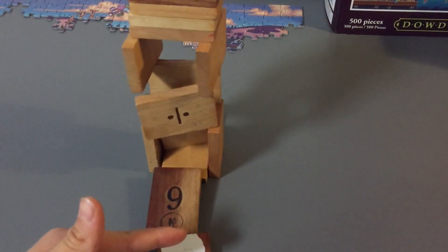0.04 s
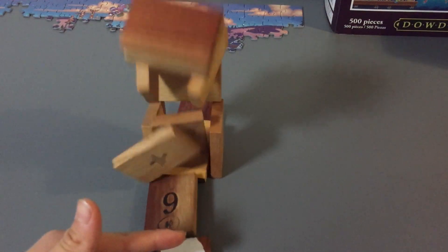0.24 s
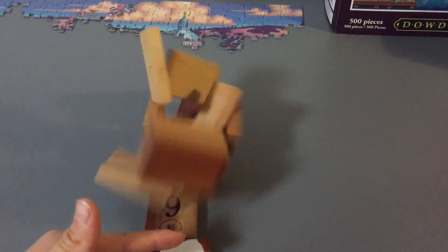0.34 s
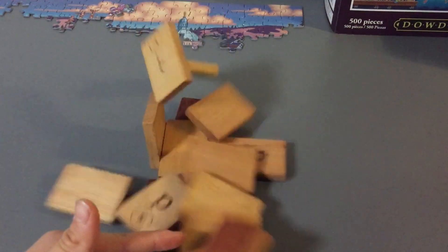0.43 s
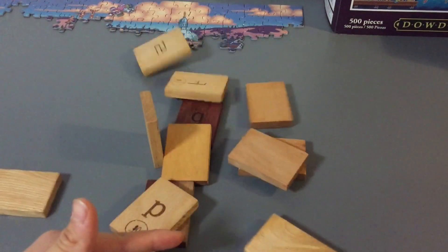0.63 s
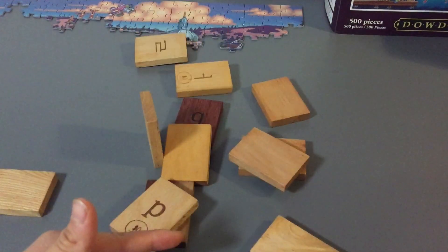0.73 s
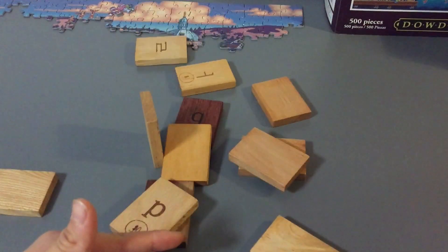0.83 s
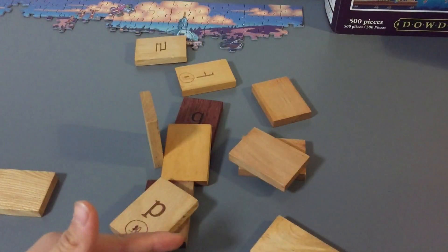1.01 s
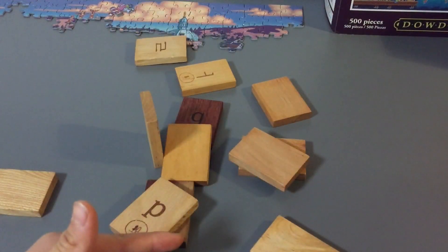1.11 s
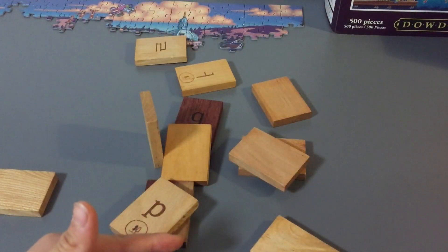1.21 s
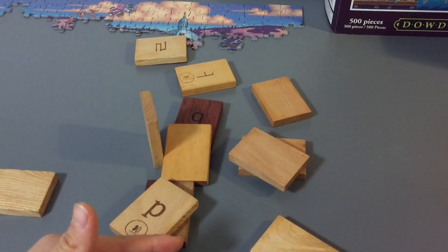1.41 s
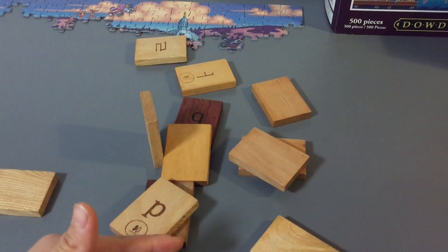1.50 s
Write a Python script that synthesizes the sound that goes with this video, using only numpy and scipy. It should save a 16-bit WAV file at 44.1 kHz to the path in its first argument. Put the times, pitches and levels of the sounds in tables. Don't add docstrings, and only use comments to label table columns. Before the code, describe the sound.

Wooden tiles scrape faintly, then a tower collapses onto a table in a dense, bright clatter lasting over half a second, ending with small bounces and rocking; close phone microphone, quiet room, loudest blows overloaded.

```python
import sys
import numpy as np
from scipy import signal
from scipy.fft import rfft, irfft
from scipy.io import wavfile

SR = 44100
rng = np.random.default_rng(int(sys.argv[2]) if len(sys.argv) > 2 else 0)


def materialize(psi):
    bounded = np.clip(np.atleast_2d(psi).T, -1, 1)
    quanta = np.round(bounded * 32767).astype(np.int16)
    wavfile.write(sys.argv[1], SR, quanta)


def volts_from_db(level):
    exponent = np.asarray(level, float) / 20
    return 10 ** exponent


N = 68355

# (frequency [Hz], level [dB])
TILE_MODES = [(1150, -19.5), (1500, -10.5), (1900, -6.5), (2400, -4.5), (2900, -4.5), (3500, -3.5),
              (4200, -10), (4900, -6), (5600, -11), (7000, -17), (8400, -16.5), (10800, -26.5),
              (13500, -37)]
# (frequency [Hz], t60 [s])
ROOM_T60 = [(200, 0.11), (700, 0.33), (1500, 0.33), (3500, 0.19), (7000, 0.093), (13000, 0.19)]
# (frequency [Hz], gain [dB])
WALL_GAIN = [(1000, -2.5), (4000, 1.5), (7000, -0.5), (14000, -2.5)]
DETUNE, UNEVEN_DB = 0.1, 2.0


def evened(x):
    return x / np.sqrt(np.mean(x ** 2) + 1e-20)


def read(points, hz):
    f, value = np.transpose(points)
    return np.interp(np.log(hz + 1), np.log(f + 1), value)


def curve(points):
    return np.interp(np.arange(N) / SR, *np.transpose(points))


def add(mix, time_s, sound):
    part = mix[round(time_s * SR):][:len(sound)]
    part += sound[:len(part)]


def coloured(x, spectrum):
    hz = np.fft.rfftfreq(len(x), 1 / SR)
    return irfft(rfft(x) * volts_from_db(read(spectrum, hz)), len(x))


def ring(hz, db, t60_s, size=5000):
    contact_s = 0.0003
    t = np.arange(size)[:, None] / SR
    decay = volts_from_db(db - 60 * t / t60_s)
    onset = 1 - np.exp(-t / contact_s)
    return (decay * onset * np.sin(2 * np.pi * hz * t)).sum(1)


def tick(hard_db, tick_db):
    tick_t60_s, crack_t60_s, crack_db = 0.003, 0.014, -12
    t = np.arange(5000) / SR
    decay = volts_from_db(-60 * t / tick_t60_s) + volts_from_db(crack_db - 60 * t / crack_t60_s)
    return np.diff(rng.standard_normal(5001)) * volts_from_db(tick_db + hard_db) * decay


def clack(modes, detune, uneven_db, hard_db, tick_db=-29.0):
    # (frequency [Hz], level [dB], t60 [s])
    table_top = [(103, -36.5, 0.033), (120, -40.5, 0.2), (274.5, -34, 0.056), (334, -29.5, 0.079),
                 (430.2, -28, 0.054), (636, -31, 0.034), (860, -37.5, 0.027)]
    hard_hz, rebound_s, rebound_db = 3300, 0.004, -7.0
    hz, db = np.transpose(modes)
    a, b = rng.standard_normal((2, len(hz)))
    t60_s = 0.009 * (3000 / hz) ** 0.35
    db = db - 3 + hard_db * np.clip(np.log2(hz / hard_hz), 0, 1)
    hit = tick(hard_db, tick_db)
    first_tile = ring(hz * (1 + detune * a), db + uneven_db * b, t60_s, size=1000)
    second_tile = ring(hz * (1 + detune * b), db - uneven_db * a, t60_s, size=1000)
    add(hit, 0, first_tile + second_tile)
    out = hit.copy()
    for late in rng.standard_normal(4):
        gain = np.sign(late) * volts_from_db(rebound_db * (1 + abs(late)))
        add(out, rebound_s * abs(late), gain * hit)
    low_hz, low_db, low_t60_s = np.transpose(table_top)
    low_hz = low_hz * (1 + 0.17 * detune * a[:len(low_hz)])
    low_db = low_db + 4.3 * rng.standard_normal(len(low_hz))
    return out + ring(low_hz, low_db, low_t60_s) * rng.choice([-1, 1])


def blows():
    # (time [s], strength [dB],
    # strongest ring [Hz], hardness [dB])
    tile_blows = [(0.2108, 6, 3240, -11), (0.2124, 0.5, 2490, -7.5), (0.2201, -11, 3000, -6),
                  (0.2255, -18, 2830, -8), (0.236, -8, 2610, 4), (0.241, -16.5, 2860, 0),
                  (0.2497, -8.5, 2960, 1), (0.2579, -5.5, 2800, -2.5), (0.2654, -11.5, 2640, -11),
                  (0.2848, 1, 5380, 1.5), (0.293, -4.5, 3400, -1.5), (.312, -18, 2470, -7.5),
                  (.328, -1, 5880, 11.5), (0.329, 0.5, 1850, 9), (0.348, 3.5, 1820, 3.5),
                  (0.357, -4, 1220, 1.5), (0.36, -1.5, 3310, -2.5), (0.3896, 8.5, 2360, 10.5),
                  (0.3977, -1.5, 2970, 9), (0.401, -8.5, 2190, 2), (.416, 4, 5500, 17),
                  (.424, 9, 1722, -5.5), (.431, 9.5, 2220, 5), (0.4391, 13, 5730, 4.5),
                  (0.455, -0.5, 3360, 7.5), (0.464, 0.5, 1970, 5.5), (.476, 2.5, 5440, -0.5),
                  (0.492, 7, 3300, 11.5), (.498, 6, 2310, 9), (0.509, 7, 5630, 1.5),
                  (0.5206, -0.5, 2150, -5.5), (0.5278, -1.5, 4090, -5.5), (0.5372, 2, 1772, -0.5),
            (0.549, -1.5, 2170, 8), (0.557, 5.5, 4934, 9.5), (0.5666, 6.5, 3950, 8.5),
            (0.5758, 2, 1623, 1.5), (0.5868, 1, 2797, 2), (0.5903, -1.5, 2944, 12), (0.6062, 0, 5820, -2),
            (0.6108, -5.5, 4794, 8.5), (0.6266, -1.5, 4625, 9), (0.6333, 1.5, 3360, 6.5),
            (0.6431, 1, 4070, 13.5), (0.6536, 2, 3930, 11.5), (0.661, 3.5, 3386, 10.5),
            (0.6696, 0.5, 1720, 5), (0.6863, -14, 4390, 15), (0.688, -14.5, 2020, -1),
            (0.7013, -9.5, 2000, -12), (0.7141, -7, 3320, 3), (0.7182, -12, 2622, -16),
            (0.7326, 0.5, 5730, 7), (0.7414, -1.5, 4910, 10.5), (0.7502, -10.5, 2593, 5),
            (0.7591, -8, 4225, -9), (0.7668, -8.5, 3650, 11), (0.7747, -4, 2200, 7.5),
                  (.786, -4.5, 2990, 8.5), (0.798, -38, 2240, -8), (0.8103, -16, 4400, 7),
                    (0.816, -21, 4650, -7), (0.8197, -3.5, 5880, 6), (.855, -13.5, 3240, 11.5),
                    (.861, -8, 1780, -13), (0.887, -11, 1900, -19), (1.066, -38.5, 1200, -20.5),
                  (0.23, -21, 2300, -5), (0.2765, -24, 2640, -10.5), (0.33, -11, 1800, 4),
                    (0.36, -0.5, 3500, 9.5), (0.35, -6.5, 1500, -1.5), (0.39, -12.5, 3600, -1.5),
                    (0.27, -14.5, 2300, -0.5), (0.55, -3, 3300, 0), (0.72, -5.5, 2140, -1.5),
                    (0.63, -13, 2200, -0.5), (0.77, -16, 2200, -1), (0.81, 0, 2470, 11),
                    (0.73, -20, 3500, -2), (0.825, -18, 2200, 12), (0.82, -11, 3500, -4),
                    (1.12, -46, 3490, -15), (0.21, 0, 3400, -12), (.2878, -5, 3200, 9), (0.34, 1, 1720, 2),
                    (0.98, -31, 2800, -17), (.929, -22, 2400, -3), (.7355, -2, 5200, 6),
                    (0.41, 5.5, 5100, -3.5), (.368, -4.5, 1700, -3.5), (.7445, -3.5, 5430, -1)]
    # (time [s], strength [dB], hardness [dB])
    rocks = [(.8352, -9, 1), (0.8705, -12, 3), (0.8799, -11, 0), (.896, -13, 4), (0.9108, -16, 3),
             (.9215, -27, 2), (0.9793, -21, 0), (.9865, -29, 3)]
    # (frequency [Hz], level [dB])
    rocker_modes = [(650, -14), (1270, -9), (1600, -5.5), (2340, -4.5), (2720, -3.5), (3450, -4.5),
                    (3950, -2.5), (4850, -5.5), (5700, -21), (7100, -9.5), (8300, -20.5), (11300, -21),
                    (13200, -28)]
    # (frequency [Hz], level [dB], t60 [s])
    thud = [(250, -17, .05), (850, -18, .035), (1090, -16, .04)]
    blow_db, main_t60_s, thud_s = -2.0, 0.009, 0.2105
    out = np.zeros(N)
    for time_s, db, hz, hard_db in tile_blows:
        blow = ring(hz, 0, main_t60_s) + clack(TILE_MODES, DETUNE, UNEVEN_DB, hard_db)
        add(out, time_s, volts_from_db(db + blow_db) * blow)
    for time_s, db, hard_db in rocks:
        rock = clack(rocker_modes, detune=0.006, uneven_db=1.5, hard_db=hard_db, tick_db=-46.0)
        add(out, time_s, volts_from_db(db) * rock)
    add(out, thud_s, ring(*np.transpose(thud)))
    return out


def clatter():
    # (time [s], level [dB])
    level = [(.21, -44), (.3, -63), (.385, -32), (.425, -17), (.6, -16), (.69, -21), (.8, -28.5),
             (.86, -32.5), (.94, -52)]
    clacks_per_s, spread_db, tiles = 1500, 2.5, 40
    t = np.arange(N) / SR
    strength = volts_from_db(spread_db * np.minimum(rng.exponential(1, N), 4))
    strength *= rng.random(N) < clacks_per_s / SR
    strength *= volts_from_db(curve(level)) * (t > level[0][0]) * (t < level[-1][0])
    tile = rng.integers(0, tiles, N)
    out = np.zeros(N)
    for k in range(tiles):
        sound = clack(TILE_MODES, 1.4 * DETUNE, UNEVEN_DB, hard_db=5.5)
        out += signal.oaconvolve(strength * (tile == k), sound)[:N]
    return out


def slide():
    # (time [s], level [dB])
    level = [(.12, -63), (.14, -47), (.152, -50.5), (.165, -39), (.178, -49.5), (.2, -54.5), (.21, -49)]
    # (frequency [Hz], density [dB per Hz])
    body = [(100, -47), (300, 1), (700, -9.5), (1050, -6.5), (1450, -1), (2000, -12), (3200, -24.5),
            (9000, -43)]
    slips_per_s, t = 1500, np.arange(N) / SR
    jerks = volts_from_db(2.5 * rng.exponential(1, N)) * (rng.random(N) < slips_per_s / SR)
    slips = rng.standard_normal(N) * (1.6 + jerks)
    return evened(coloured(slips, body)) * volts_from_db(curve(level)) * (t > level[0][0]) * (t < level[-1][0])


def room_decay(x):
    hz, t, z = signal.stft(x, SR, nperseg=256)
    return signal.istft(z * volts_from_db(-60 * t / read(ROOM_T60, hz)[:, None]), SR, nperseg=256)[1]


def tail():
    taps = np.zeros(SR // 2)
    at = np.arange(500, SR // 2 - 20, 20)
    taps[at + rng.integers(0, 20, len(at))] = rng.choice([-1., 1.], len(at))
    out = room_decay(taps)
    return coloured(out / np.linalg.norm(out), WALL_GAIN)


def room(x):
    # (delay [s], level [dB])
    echoes = [(.0017, -10.5), (.0034, -10.5), (.0052, -16), (.0081, -17.5)]
    tail_db, turn_hz = -6.5, 9
    out = x.copy()
    turn = 2 * np.pi * turn_hz * np.arange(N) / SR
    for k, (delay_s, db) in enumerate(echoes):
        add(out, delay_s, (-1) ** k * volts_from_db(db) * coloured(x, WALL_GAIN))
    for k in range(3):
        share = np.sqrt(2 / 3) * np.cos(turn + k * np.pi / 3)
        out += volts_from_db(tail_db) * signal.fftconvolve(x * share, tail())[:N]
    return out


def glass():
    # (time [s], level [dB])
    starts = [
        (0.0, -46),
        (.88, -43),
    ]
    glass_hz, t60_s, beat_hz, beat_depth = 2319.0, 1.8, 4.7, 0.12
    t = np.arange(N) / SR
    level = np.zeros(N)
    for time_s, db in starts:
        fade_in = np.clip((t - time_s) * 20 + 1, 0, 1)
        level += volts_from_db(db - 60 * (t - time_s) / t60_s) * fade_in
    beat = 1 + beat_depth * np.cos(2 * np.pi * beat_hz * t)
    return level * beat * np.sin(2 * np.pi * glass_hz * t)


def earlier():
    # (frequency [Hz], density [dB per Hz])
    colour = [(300, -20), (1000, -10.5), (1500, -3.5), (2900, 2), (4500, -9), (8000, -19)]
    noise = evened(coloured(rng.standard_normal(N), colour))
    return volts_from_db(-50.5) * room_decay(noise)[:N]


def air():
    # (frequency [Hz], density [dB per Hz])
    colour = [(12, -12), (25, 4.5), (55, 1.5), (120, -15.5), (220, -21), (800, -34.5), (2000, -32.5),
              (16000, -48), (17600, -59.5)]
    # (time [s], gain [dB])
    swell = [(0, 9), (.5, 8), (1.1, 3), (1.3, 3), (1.55, 6)]
    # (frequency [Hz], rms level [dB])
    hum_tones = [(699.8, -75)]
    air_db, t = -48.5, np.arange(N) / SR
    noise = volts_from_db(air_db) * evened(coloured(rng.standard_normal(N), colour))
    low = signal.sosfilt(signal.butter(1, 500, fs=SR, output="sos"), noise)
    hum = sum(np.sqrt(2) * volts_from_db(db) * np.sin(2 * np.pi * hz * t) for hz, db in hum_tones)
    return noise + low * (volts_from_db(curve(swell)) - 1) + hum


def scene():
    no_bass = signal.butter(2, 80, "high", fs=SR, output="sos")
    tiles = signal.sosfilt(no_bass, blows() + clatter() + slide())
    return (room(tiles) + glass() + earlier() + air())[None]


def roll_off(x):
    return signal.sosfilt(signal.butter(12, 16670, fs=SR, output="sos"), x)


def record(dry):
    clip, knee, edge_hz = 0.5, 24.0, 15800
    flat = dry / (1 + abs(dry / clip) ** knee) ** (1 / knee)
    no_bass = signal.butter(2, 120, "high", fs=SR, output="sos")
    flat = dry + signal.sosfiltfilt(no_bass, flat - dry)
    band_limit = signal.firwin(255, edge_hz, window=("kaiser", 5), fs=SR)
    mix = signal.oaconvolve(flat, band_limit[None], "same")
    return roll_off(mix)


dry = scene()
out = record(dry)
materialize(out)
```